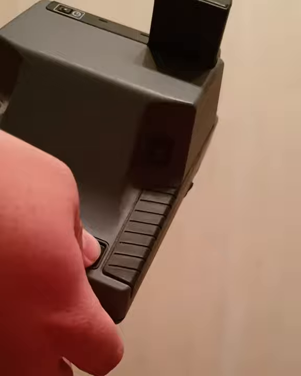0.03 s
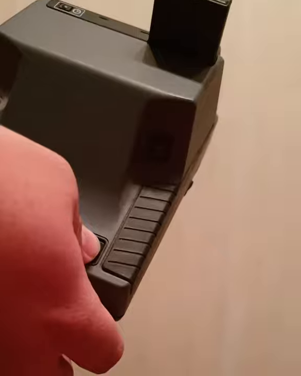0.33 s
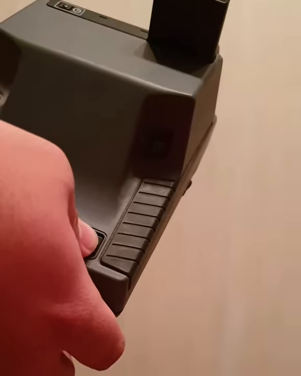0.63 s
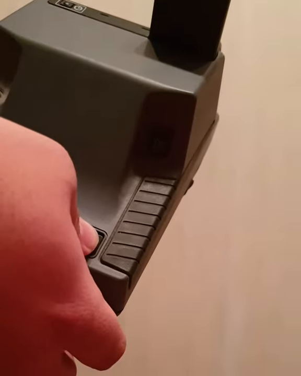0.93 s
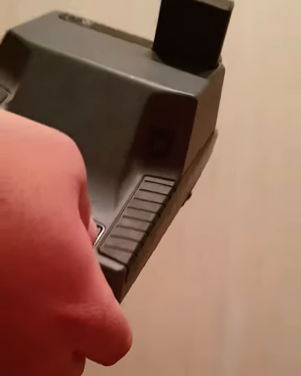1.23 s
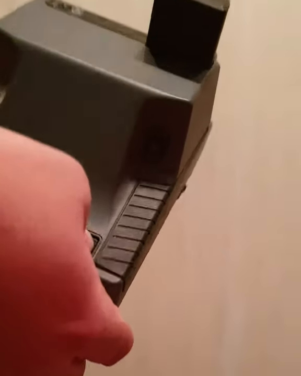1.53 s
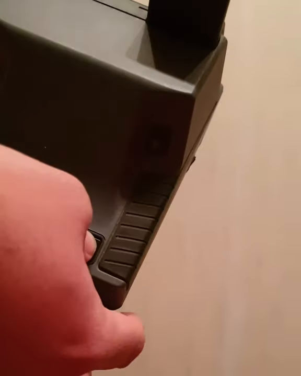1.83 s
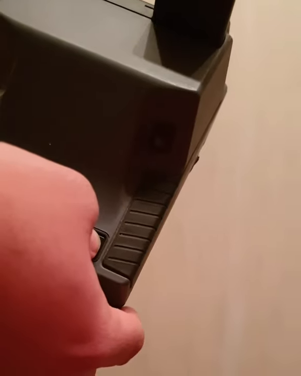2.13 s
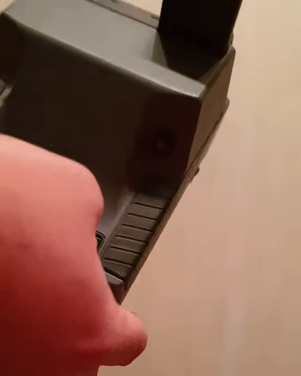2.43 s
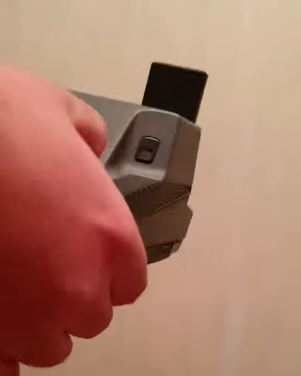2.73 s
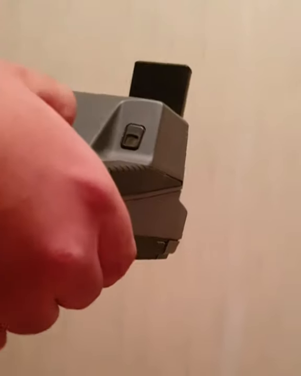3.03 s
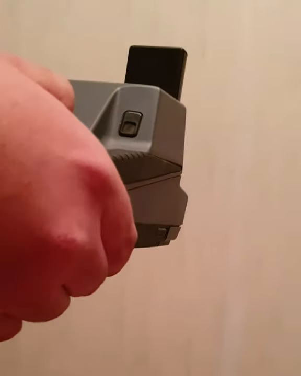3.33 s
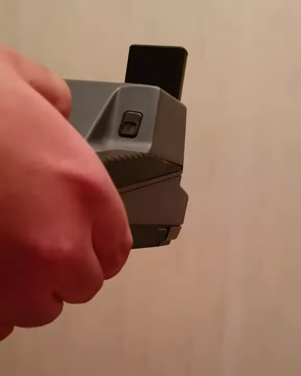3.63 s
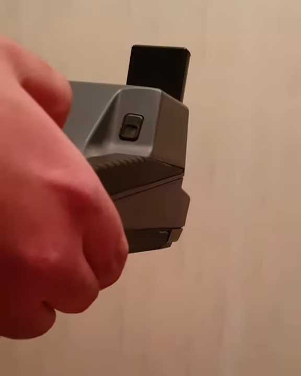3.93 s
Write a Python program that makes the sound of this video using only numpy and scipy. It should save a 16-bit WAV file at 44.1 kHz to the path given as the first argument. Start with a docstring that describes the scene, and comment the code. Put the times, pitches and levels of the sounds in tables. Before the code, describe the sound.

Close up in a small, faintly hissing room, an instant camera is handled with soft plastic bumps. It then clacks, whirs briefly, pauses, and snaps again as its motor whines upward to push the picture out.

```python
"""An instant camera clacks and whirs, held close by in a quiet, hissy room. First fingers rub and bump
its hollow plastic case. Then the motor runs briefly between two clacks and rests while the picture is
taken. The levers snap again and the gears wind up, with a rising whine, to push the picture out.
The case rings and the small room adds a short echo."""
import sys
import numpy as np
from scipy import signal
from scipy.fft import rfft, irfft, next_fast_len
from scipy.io import wavfile
from scipy.ndimage import map_coordinates

SR = 44100
rng = np.random.default_rng(int(sys.argv[2]) if len(sys.argv) > 2 else 0)


def put_to_file(sound):
    """Save the sound as 16-bit audio at rate SR, in the file named by the first command-line argument."""
    columns = np.atleast_2d(sound).T  # one column per channel
    safe = np.clip(columns, -1, 1)
    whole_steps = np.round(safe * 32767)
    wavfile.write(sys.argv[1], SR, whole_steps.astype(np.int16))


N = 176400
T = np.arange(N) / SR
ROOM_FADE_S = 0.24  # every "fade" here is the time to die away by 60 dB

# how fast the teeth of the fast gear meet (time [s], tooth rate [Hz])
TOOTH_RATE = [(3.73, 1250), (3.81, 1470), (3.86, 1550), (3.89, 1635), (3.93, 1725), (4.0, 1780)]
# hollow tone of the case when it is touched (frequency [Hz], level [dB])
HOLLOW_TONE = [(100, -23.5), (220, -11.5), (330, -2.5), (450, 4), (750, -14.5), (1050, -10.5),
               (1400, -22.5), (4000, -59)]


def amp(db):
    """Turn decibels into a volume factor."""
    return 10 ** (np.asarray(db) / 20)


def unit(x):
    """Scale x to an average power of 1."""
    return x / np.sqrt(np.mean(x ** 2) + 1e-20)


def along(points, hz):
    """Read between (frequency, value) points on an octave scale."""
    f, v = np.transpose(points)
    return np.interp(np.log(hz + 1), np.log(f + 1), v)


def curve(rows, outside=None):
    """Join (time, value) points into one value per sample."""
    return np.interp(T, *np.transpose(rows), left=outside, right=outside)


def wobble(rate):
    """A smooth curve through `rate` random values a second."""
    return map_coordinates(rng.standard_normal(int(N * rate / SR) + 4), [T * rate])


def panned(db):
    """Split a left-minus-right difference into a dB change for each side."""
    return np.array([[.5], [-.5]]) * db


def hump(hz, centre_hz, octaves):
    """A broad bell shape around one frequency."""
    return np.exp(-(np.log2((hz + 1) / centre_hz) / octaves) ** 2)


def coloured(x, gain_db):
    """Filter x by a curve of dB over frequency; only the curve's shape counts, not its height."""
    n = x.shape[-1]
    m = 2 * next_fast_len(n // 2 + 2048)
    db = gain_db(np.fft.rfftfreq(m, 1 / SR))
    cepstrum = irfft(np.log(unit(amp(db)) + 1e-6), m)
    # fold it so that the filter rings only after a sound, never before
    cepstrum[..., 1:m // 2] *= 2
    cepstrum[..., m // 2 + 1:] = 0
    return irfft(rfft(x, m) * np.exp(rfft(cepstrum)), m)[..., :n]


def noise(size, alike=None):
    """White stereo noise, alike on both sides in the bass and nearly unrelated in the treble."""
    # how alike left and right are by default (frequency [Hz], likeness [0 to 1])
    usual_alike = [(60, 0.44), (200, 1), (380, 0.74), (520, 0.079), (750, 0.018), (15000, 0.1)]
    likeness = along(alike or usual_alike, np.fft.rfftfreq(size, 1 / SR))
    turn = np.arccos(np.clip(likeness, -1, 1)) / 2
    mid, side = irfft(rfft(rng.standard_normal((2, size))) * [np.cos(turn), np.sin(turn)], size)
    return np.array([mid + side, mid - side])


def add(out, start_s, sound):
    """Mix a sound in at its start time."""
    part = out[:, round(start_s * SR):][:, :sound.shape[-1]]
    part += sound[..., :part.shape[-1]]


def hiss():
    """Faint room rumble and microphone hiss, stronger on the left, where the treble swells and sinks."""
    # tone of the steady rumble and hiss (frequency [Hz], level [dB])
    steady_tone = [(15, -38.5), (25, -12.5), (80, -5.5), (284, -20), (342, -27.5), (527, -18), (654, -23.5),
                   (981, -20), (1150, -13), (1360, -8), (1470, -5), (2090, 0), (2810, -7.5), (3580, -10),
                   (6310, -32.5), (8970, -39), (12400, -25), (15800, -29.5)]
    # which way it leans (frequency [Hz], left minus right [dB])
    balance = [(60, 5), (200, 5), (400, -4.5), (560, 0), (750, 1), (1000, 7), (1300, 23.5), (2400, 25.5),
               (4400, 16.5), (6300, -1.5), (8100, 1.5), (12000, -1), (15000, -0.5)]
    # how alike its two sides are (frequency [Hz], likeness [0 to 1])
    alike = [(60, 0.63), (300, 0.25), (640, 0.01)]
    # swell of the extra treble on the left (time [s], level [dB])
    treble_level = [(0, -77), (.33, -74), (.42, -66), (.6, -72.5), (.85, -68), (1.0, -74), (1.15, -70.5),
                    (1.7, -70.5), (1.9, -69.5), (2.12, -70.5), (2.27, -64), (2.52, -65), (2.6, -72.5),
                    (2.9, -73), (3.1, -72.5), (3.3, -69)]
    # tone of that treble (frequency [Hz], level [dB])
    treble_tone = [(1000, -15), (3000, -3), (4500, 4.5), (6500, -2), (7500, -35), (9000, -24.5),
                   (12000, -11.5), (16000, -21)]

    def tone(hz):
        sides = amp(panned(along(balance, hz)))
        return along(steady_tone, hz) + 20 * np.log10(sides / np.linalg.norm(sides, axis=0))
    out = amp(-59.5) * coloured(noise(N, alike), tone)
    treble = rng.standard_normal(N) * amp(curve(treble_level))
    out[0] += coloured(treble, lambda hz: along(treble_tone, hz))
    return out


def room():
    """The small room's echo: a burst of noise that dies away quickly."""
    t = np.arange(SR // 2) / SR
    echo = noise(len(t)) * amp(-60 * t / ROOM_FADE_S) * (1 - np.exp(-t / 0.001))
    return unit(echo) / np.sqrt(len(t))


def case(hz):
    """The plastic case rings at certain pitches; gives the boost in dB for each side."""
    # where the case rings (frequency [Hz], width [Hz], left boost [dB], right boost [dB])
    rings = [(382, 13, 8.5, 4), (407, 23, 6, -3), (457, 27, 3, 9.5), (519, 41, -13, 11.5),
             (579, 51, -7, 8.5), (670, 65, -1, 9.5), (872, 180, 7, -9), (1046, 53, 9.5, 22.5),
             (1420, 53, 11.5, -7), (1580, 48, 4, 6.5), (1700, 170, 4.5, 10), (2055, 81, 8.5, 7),
             (2290, 120, 0.5, 12), (2630, 31, 7, 9), (3120, 100, 4.5, 2), (3200, 77, 7, 2),
             (5390, 310, -14, 5), (6380, 140, -12, 4.5)]
    return sum(np.array([[left], [right]]) / (1 + (2 * (hz - centre) / width) ** 2)
               for centre, width, left, right in rings)


def grip():
    """Skin drags on the case, making an uneven hollow murmur and soft dry swishes."""
    # strength of the rubbing (time [s], level [dB])
    rub_level = [(0, -106), (.17, -90), (.27, -79), (.42, -88), (.55, -78), (.8, -84.5), (1.15, -88),
                 (1.18, -72.5), (1.27, -77), (1.33, -64), (1.48, -79), (1.62, -62.5), (1.8, -85.5),
                 (2.38, -84.5), (2.65, -63), (2.74, -70), (2.84, -71), (3.0, -84), (3.27, -88), (3.32, -54),
                 (3.7, -62)]
    # shifts of the grip (peak time [s], spread [s], level [dB], brightness [dB per octave])
    swishes = [(1.168, .015, -75, 2.5), (1.319, 0.045, -74, 2), (1.593, 0.037, -67, -0.5),
               (2.559, 0.043, -71.5, 7), (2.672, .05, -69, -3), (2.918, 0.046, -76, -4)]
    # tone of a swish (frequency [Hz], level [dB])
    swish_tone = [(500, -4), (2000, 5), (4000, 0), (6500, 9), (7600, -4), (9000, -27), (13000, 2),
                  (16000, -36)]
    rub = noise(N) * amp(curve(rub_level) + 2.1 * wobble(60))
    out = coloured(rub, lambda hz: along(HOLLOW_TONE, hz) + 0.35 * case(hz) + panned(-5))
    t = np.arange(SR) / SR - .5
    for peak_s, spread_s, db, tilt in swishes:
        stroke = noise(SR) * amp(db + panned(-4.5)) * np.exp(-(t / spread_s) ** 2 / 2)
        add(out, peak_s - .5, coloured(stroke, lambda hz: along(swish_tone, hz) + tilt * np.log2(hz + 1)))
    return out


def bumps():
    """Fingers knock the hollow case: each bump is a low thud, its echo and a soft scuffing tick."""
    # finger bumps (time [s], level [dB], pitch [Hz], tick boost [dB], left minus right [dB])
    knocks = [(1.302, -51, 410, -0.5, -7), (1.331, -64, 444, 0, -3), (1.366, -49, 443, -18, -7),
              (1.377, -51, 453, -20, -6), (1.555, -52, 410, -2, -6), (1.5783, -35.5, 372, -13.5, -2.5),
              (2.645, -51.5, 466, 0.5, -7), (2.676, -54, 453, -2, -12), (2.778, -64, 480, -10, -8),
              (2.83, -66, 480, -9, -13), (3.286, -46.5, 410, -11, -3), (3.306, -36, 394, -18, -5),
              (3.567, -54, 424, -23, -8), (3.586, -45, 424, -16, -1), (3.604, -49, 402, -7, -5),
              (3.627, -41.5, 420, -21, 0), (3.669, -41, 396, -22, -1)]
    # tone of the tick (frequency [Hz], level [dB])
    tick_tone = [(200, -24), (1000, 1), (2000, 2.5), (3200, -2.5), (6500, -14), (8500, -34), (14000, -30)]
    # which way the tick leans (frequency [Hz], left minus right [dB])
    tick_balance = [(700, 9), (2000, 9.5), (5500, 5.5)]
    thud_rise_s, thud_fade_s = 0.0045, 0.034
    tick_rise_s, tick_fade_s = 0.0023, 0.098
    out, t = np.zeros((2, N)), np.arange(SR // 2) / SR
    for start_s, db, pitch, tick_db, side_db in knocks:
        thud = 2 * np.sin(2 * np.pi * pitch * t) * amp(-60 * t / thud_fade_s)
        thud *= 1 - np.exp(-t / thud_rise_s)
        echo = noise(len(t)) * amp(-14 - 60 * t / ROOM_FADE_S)
        echo = coloured(echo, lambda hz: along(HOLLOW_TONE, hz) + 0.31 * case(hz))
        scuff = noise(len(t)) * amp(tick_db - 60 * t / tick_fade_s) * (1 - np.exp(-t / tick_rise_s))
        tick = coloured(scuff, lambda hz: along(tick_tone, hz) + panned(along(tick_balance, hz)))
        add(out, start_s, amp(db) * ((thud + echo) * amp(panned(side_db)) + tick))
    return out


def gears(effort, tone, ring):
    """Gear teeth chatter with uneven strength and shake the case; `ring` sets how much it rings."""
    # which way the chatter leans (frequency [Hz], left minus right [dB])
    balance = [(100, -3), (380, -1), (600, -2.5), (1300, 1.5), (2400, 2.5), (4400, -2), (8000, -1.5),
               (15000, -5.5)]
    teeth_passed = np.cumsum(curve(TOOTH_RATE)) / SR
    strength = np.exp(0.16 * rng.standard_normal(N))[teeth_passed.astype(int)]
    pulses = unit(strength * np.exp(-1.5 * (teeth_passed % 1)))  # one fading pulse per tooth
    chatter = pulses * noise(N) * amp(curve(effort, outside=-np.inf))
    return coloured(chatter, lambda hz: along(tone, hz) + ring * case(hz) + panned(along(balance, hz)))


def whine(tooth_hz):
    """Two loose gear stages sing blurred tones; each swells as it passes a pitch where the case rings."""
    # gear tones (multiple of the slow gear's tooth rate, level [dB], blur [Hz])
    gear_tones = [(1, -59, 25), (2, -51, 27), (3, -56, 40), (6, -38, 45), (9, -51, 180), (12, -38, 300),
                  (18, -44, 820)]
    gear_ratio = 3
    slow_phase = 2 * np.pi * np.cumsum(tooth_hz / gear_ratio) / SR
    tones = np.zeros((2, N))
    for multiple, db, blur_hz in gear_tones:
        flutter = np.array([wobble(blur_hz) + 1j * wobble(blur_hz) for side in range(2)]) / 2
        tones += amp(db) * np.real(flutter * np.exp(1j * multiple * slow_phase))
    return coloured(tones, lambda hz: 0.99 * case(hz))


def motor():
    """The motor turns the gears twice; the second time, a whine climbs and the rattle brightens."""
    # how hard the motor works in the short first run (time [s], level [dB])
    first_effort = [(3.318, -33), (3.335, -34), (3.375, -41.5), (3.41, -35), (3.44, -38), (3.475, -33),
                    (3.495, -48.5), (3.51, -73)]
    # tone of that run (frequency [Hz], level [dB])
    first_tone = [(59, -56), (100, -24), (420, -5), (668, -1.5), (825, -4), (1230, -9), (1960, -4),
                  (4100, -6.5), (5400, -4.5), (8230, -21.5), (11800, -21), (15500, -18)]
    # how hard it works to push the picture out (time [s], level [dB])
    eject_effort = [(3.718, -64), (3.737, -32), (3.756, -28.5), (3.78, -34.5), (3.82, -33), (3.88, -31.5),
                    (3.94, -31.5), (4.0, -33.5)]
    # tone of that push (frequency [Hz], level [dB])
    eject_tone = [(35, -59), (60, -27.5), (226, -24), (359, -2.5), (453, -0.5), (738, -13), (1050, -9),
                  (1260, -13), (1670, -8), (4120, -11.5), (6410, -7), (8280, -19), (12000, -8.5),
                  (15500, -18.5)]
    whine_db_per_octave, sizzle_db_per_octave, echo_db = 18, 13, -5.5
    tooth_hz = curve(TOOTH_RATE)
    octaves = np.log2(tooth_hz / tooth_hz.max())  # 0 at top speed, negative when slower
    eject = gears(eject_effort, eject_tone, ring=0.64)
    sizzle = signal.sosfiltfilt(signal.butter(2, 8000, 'high', fs=SR, output='sos'), eject)
    eject += sizzle * (amp(sizzle_db_per_octave * octaves) - 1)  # slower gears sound duller
    rattle = gears(first_effort, first_tone, ring=0.34) + eject
    ejecting = T > TOOTH_RATE[0][0]
    direct = rattle + whine(tooth_hz) * amp(whine_db_per_octave * octaves + panned(-1.1)) * ejecting
    return direct + amp(echo_db) * signal.fftconvolve(direct, room(), axes=1)[:, :N]


def snaps():
    """Each lever strike is a short crack that rings the case and dies away in the room."""
    # lever and latch strikes (time [s], level [dB], body boost [dB], clack boost [dB],
    # ping boost [dB], sizzle boost [dB], left minus right [dB])
    strikes = [(3.3193, -29.5, 11, 1, 6, 6, 12), (3.3256, -25.5, 4, 3, -1, -1, -5.5),
               (3.333, -39, 6, 5, -6, 12, 10), (3.342, -31, 15, -12, 10, 17.5, -20),
               (3.351, -50, 14, -8, -4, 8, -5), (3.4375, -31.5, -16, 7, 1, -4, 3),
               (3.444, -31.5, 6.5, 1, 1, -6, -13), (3.452, -42, 6, -8, -9, -2, -15),
               (3.459, -26.5, -0.5, 16, 2, -13, 4), (3.4621, -32.5, 10, -8, -3, 8, -5),
               (3.468, -32.5, -5, 12, -6, 1, -22), (3.478, -37.5, 10, 5, 2, 5, -18),
               (3.488, -41.5, 1, 5, 7, 4, -1), (3.7333, -23.5, -17, 1, 5, 4.5, 18),
               (3.7421, -29, -5, -13, 1, -2.5, -8), (3.7440, -18.5, -3.5, -6, 7, -8, 2.5),
               (3.7513, -28.5, 0, -18, -5, -10, -11)]
    # tone that all strikes share (frequency [Hz], level [dB])
    snap_tone = [(60, -28), (200, -20.5), (380, 3), (600, 1), (850, -5.5), (1500, -4.5), (3000, -0.5),
                 (4300, -3.5), (6400, 1.5), (8400, -24), (11500, -9), (15500, -21)]
    # which way they lean (frequency [Hz], left minus right [dB])
    balance = [(100, -5), (400, -2.5), (650, 2.5), (1300, -2.5), (2500, 4), (5000, -5.5), (8000, -1),
               (14000, -9.5)]
    rise_s, fade_s, echo_db = 0.00044, 0.024, -10.5
    out, t = np.zeros((2, N)), np.arange(SR // 2) / SR
    crack, echo = amp(-60 * t / fade_s), amp(echo_db - 60 * t / ROOM_FADE_S)
    shape = np.hypot(crack, echo) * (1 - np.exp(-t / rise_s))
    for start_s, db, body_db, clack_db, ping_db, sizzle_db, side_db in strikes:
        def tone(hz):
            return (along(snap_tone, hz) + case(hz) + panned(along(balance, hz) + side_db)
                    + body_db * hump(hz, 490, 0.76) + clack_db * hump(hz, 1450, 0.3)
                    + ping_db * hump(hz, 5500, 0.54) + sizzle_db * hump(hz, 11600, 0.55))
        add(out, start_s, amp(db + 4) * coloured(noise(len(t)) * shape, tone))
    return out


def scene():
    """The camera's levers and motor, and the hand that holds it, over the hiss."""
    return snaps() + motor() + bumps() + grip() + hiss()


def record(dry):
    """Cut off the very highest treble."""
    top_hz = 15850
    m = next_fast_len(N + SR // 2)
    return irfft(rfft(dry, m) * (np.fft.rfftfreq(m, 1 / SR) < top_hz), m)[:, :N]


dry = scene()
out = record(dry)
put_to_file(out)
```